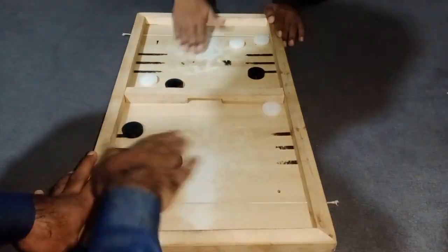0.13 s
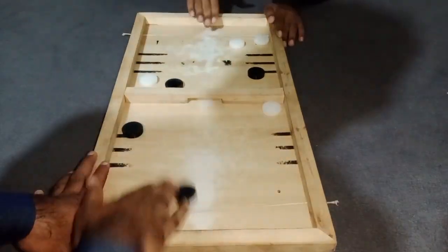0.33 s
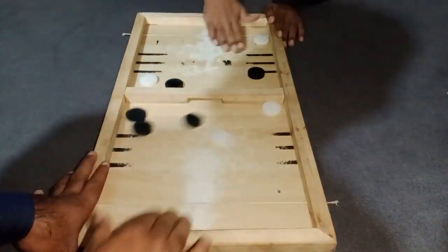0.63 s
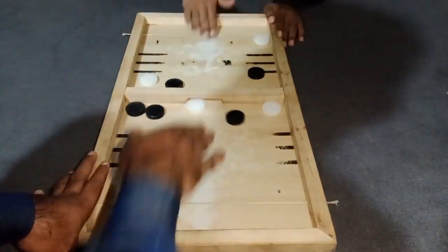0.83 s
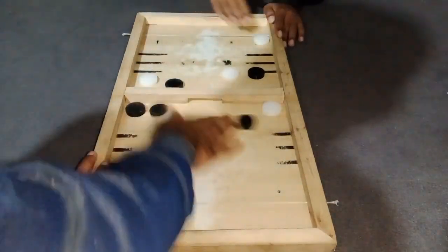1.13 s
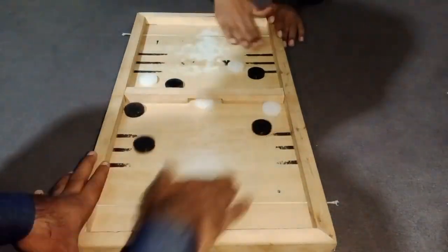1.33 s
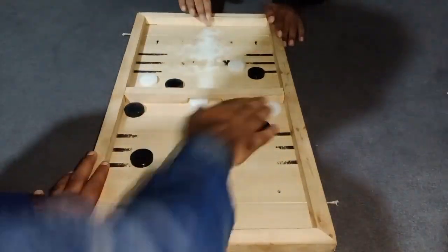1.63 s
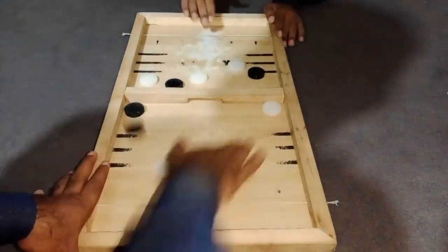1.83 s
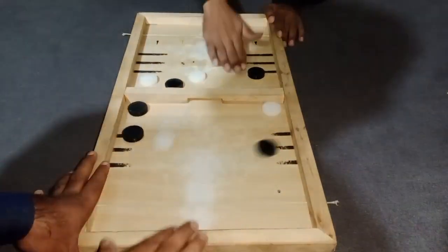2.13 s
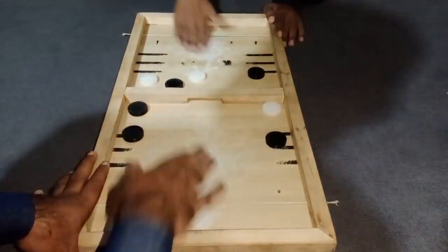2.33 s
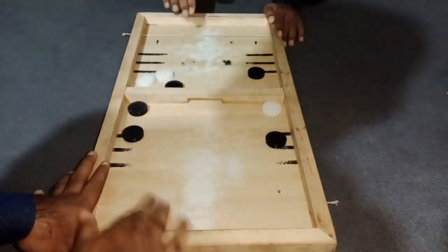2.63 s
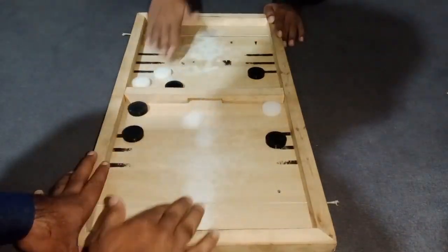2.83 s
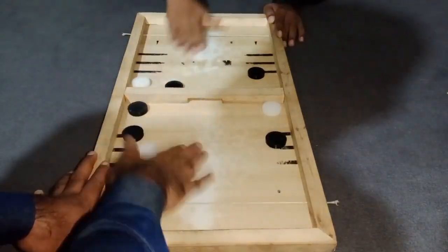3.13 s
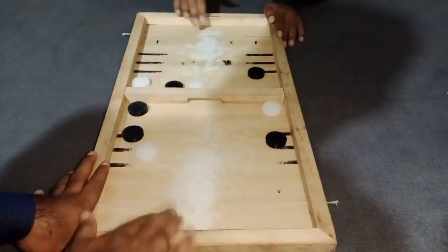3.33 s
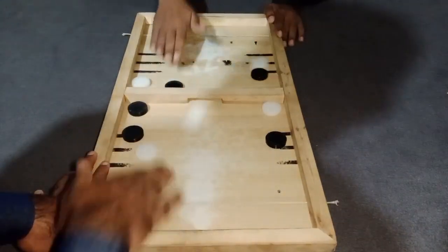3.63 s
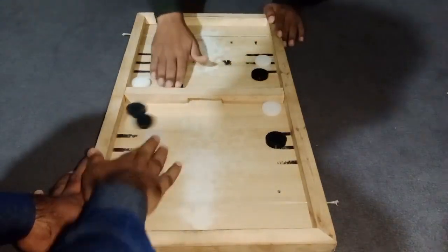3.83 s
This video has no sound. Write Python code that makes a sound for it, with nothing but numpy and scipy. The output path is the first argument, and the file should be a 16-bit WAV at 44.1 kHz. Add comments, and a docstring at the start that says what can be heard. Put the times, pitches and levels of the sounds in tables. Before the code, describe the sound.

Wooden board game pucks knock rails in quick irregular bursts, with scrapes and soft hand thuds

```python
"""Hard pucks, shot by two players across a wooden board, clack on each other and knock on the rails. Each blow
is a click, ringing wood and dying ticks; shaped noise answers it late, as a swelling reverberation. Pucks and
sleeves slide in between (patchy noise); hands thud on the board, and a short low bump comes at 2.12 s (soft
bursts of low noise). A quiet room hums below in steady noise, and a look-ahead limiter ducks around the hardest
blows."""
import sys
import numpy as np
from scipy import signal
from scipy.fft import rfft, irfft, next_fast_len
from scipy.io import wavfile
from scipy.ndimage import uniform_filter1d, minimum_filter1d, map_coordinates

SR = 44100
rng = np.random.default_rng(int(sys.argv[2]) if len(sys.argv) > 2 else 0)


def log_audio(samples):
    """Write samples as a 16-bit WAV file to the path given in sys.argv[1]."""
    # one column per channel
    frames = np.atleast_2d(samples).T
    # limit to full scale, then quantise
    limited = np.clip(frames, -1, 1)
    pcm = np.round(limited * 32767).astype(np.int16)
    wavfile.write(sys.argv[1], SR, pcm)


N = 176400  # samples: 4 s


def amp(db):
    """Decibels to gain."""
    return 10 ** (np.asarray(db) / 20)


def unit(x):
    """Scaled to rms 1."""
    return x / np.sqrt(np.mean(x ** 2) + 1e-20)


def over(x, seconds):
    """Scaled so that its energy equals rms 1 for that long."""
    return x / np.sqrt(np.sum(x ** 2) / (seconds * SR) + 1e-20)


def fade(t, t60):
    """Exponential decay that falls by 60 dB in t60 seconds."""
    return np.exp(-np.log(1000) * t / t60)


def along(points, hz):
    """Read a curve of (Hz, value) points on a log frequency axis."""
    f, v = np.transpose(points)
    return np.interp(np.log(hz + 1), np.log(f + 1), v)


def filtered(x, response):
    """x with each frequency scaled by response(hz)."""
    m = next_fast_len(len(x) + 4096)
    gain = response(np.fft.rfftfreq(m, 1 / SR))
    return irfft(rfft(x, m) * gain, m)[:len(x)]


def add(out, x, s):
    """Mix x into out at s seconds; a start before zero loses its beginning."""
    k = round(s * SR)
    x, k = x[max(-k, 0):], max(k, 0)
    out[k:k + len(x)] += x[:len(out) - k]


# Tone shared by all blows: (frequency [Hz], level [dB])
BLOW_TONE = [(60, -25), (200, -2), (380, 8), (900, 4), (2000, 0), (5500, -1), (8000, -3), (9800, -14),
             (12300, -13), (16000, -25)]
# Where the low, mid, presence, treble and top levels of a blow apply: (frequency [Hz])
BAND_CENTRES = [380, 1150, 3200, 6800, 11000]
TOP_FALLS = 1.8  # a blow with weak treble loses this many times as many dB in the top band


def colour(band_db):
    """The short causal pulse of a blow with these low, mid, presence and treble levels; dull ones lose the top."""
    hz = np.fft.rfftfreq(1024, 1 / SR)
    treble = band_db[-1]
    levels = [*band_db, min(treble, TOP_FALLS * treble)]
    level_db = along(BLOW_TONE, hz) + along(list(zip(BAND_CENTRES, levels)), hz)
    # folding the cepstrum gives minimum phase: the pulse starts at once
    cepstrum = irfft(np.log(amp(level_db)))
    half = len(hz) - 1
    fold = np.r_[1, np.full(half - 1, 2), 1, np.zeros(half - 1)]
    return irfft(np.exp(rfft(cepstrum * fold)))


# Notes that puck and board ring with: (frequency [Hz], level against each other [dB], time to fall 60 dB [s])
WOOD_NOTES = [(310, -15.5, 0.19), (362.7, -11, 0.21), (408, -14, 0.13), (518, -18, 0.034),
              (800, -2.5, 0.028), (1150, -13, 0.028), (2474, -4.5, 0.034), (2775, -9.5, 0.075),
              (3830, 8, 0.0064), (4392, 7.5, 0.012), (5190, 20.5, 0.00077), (7390, 23, 0.0017)]
# the board's main note, whose pitch depends on the spot that is struck
KNOCK_DB, KNOCK_T60_S = 3, 0.036


def snap(t, ring_db, knock_hz):
    """An impulse plus the note of the struck spot and other wood notes, each varying in strength every time."""
    notes = [*WOOD_NOTES, (knock_hz, KNOCK_DB, KNOCK_T60_S)]
    hz, db, t60 = np.transpose(notes)[:, :, None]
    varied_db = db + 2 * rng.standard_normal(hz.shape)
    ring = np.sum(amp(varied_db) * fade(t, t60) * np.cos(2 * np.pi * hz * t), axis=0)
    impulse = t == 0
    return impulse + amp(ring_db) * ring / np.linalg.norm(ring)


def burst(t, db, t60, rate):
    """Dying random ticks of a given total energy, on average rate a second."""
    ticks = rng.standard_normal(len(t)) * (rng.random(len(t)) < rate / SR)
    x = ticks * fade(t, t60)
    return amp(db) * x / np.linalg.norm(x)


RING_DB = 1  # ringing wood against the impulse
# levels against the impulse and fall times, both before a dull blow raises or a bright one lowers them
CRACK_DB, CRACK_T60_S = 6, .0075
RATTLE_DB, RATTLE_T60_S, RATTLE_RATE = -2, 0.16, 2500  # puck chattering on the board, ticks per second
SOFTER_DB = 20  # this much less treble doubles the lengths and the gain of crack and rattle


def clack(t, band_db, knock_hz):
    """One blow: snap, crack and a rattle of tiny contacts; duller blows last longer and rattle more."""
    slow = 2 ** np.clip(-band_db[-1] / SOFTER_DB, -1, 1)
    crack = burst(t, CRACK_DB, CRACK_T60_S * slow, SR)
    rattle = burst(t, RATTLE_DB, RATTLE_T60_S * slow, RATTLE_RATE)
    contact = snap(t, RING_DB, knock_hz) + slow * (crack + rattle)
    return over(signal.fftconvolve(contact, colour(band_db)), .005)


# How long the reverberation lingers: (frequency [Hz], time to fall 60 dB [s])
ROOM_FADE = [(150, 0.66), (1200, 0.31), (6000, 0.33)]
# Tone of the reverberation: (frequency [Hz], level [dB])
ROOM_TONE = [(100, -5.5), (350, -0.5), (700, 3.5), (1250, 4), (2000, -2), (3300, 3), (5500, -2),
             (7500, -0.5), (11500, -8), (15000, -21)]
ROOM_START, SWELL_S = 0.34, 0.048  # the swell's first gain, and the time until it reaches 1
ROOM_GRAIN_DB = 2.5  # random unevenness from moment to moment


def reverberation(x):
    """An uneven, diffuse answer of fading noise that swells and lingers longest in the bass."""
    hz, t, z = signal.stft(rng.standard_normal(SR * 2 // 3), SR, nperseg=256)
    fading = fade(t, along(ROOM_FADE, hz)[:, None])
    tone = amp(along(ROOM_TONE, hz))[:, None]
    swell = np.minimum(ROOM_START + (1 - ROOM_START) * (t / SWELL_S) ** 2, 1)
    uneven = amp(ROOM_GRAIN_DB * rng.standard_normal(len(t)))
    tail = signal.istft(z * fading * tone * swell * uneven, SR, nperseg=256)[1]
    return over(signal.fftconvolve(x, tail), .07)


# Puck blows: (time [s], level [dB], low, mid and treble against the 2-5 kHz band [dB each],
# reverberation level [dB], note of the struck spot [Hz])
PUCK_BLOWS = [(-0.025, -34, -30.5, -6, -14, -27, 1380), (0.5631, -12.5, -9.5, -1.5, 9, -26, 980),
              (0.6188, -10, -25, -10, -11, -31, 1300), (0.6428, -15, -17.5, -4.5, -9, -30, 1280),
              (0.6604, -34, -30, 0, -6.5, -29.5, 990), (0.704, -15.5, -30.5, -6.5, -42, -46, 920),
              (0.767, -25.5, -11, -15, -7, -69, 1450), (0.849, -27, -31, 15, -5, -36.5, 1540),
              (0.8676, -24, -19.5, -2, -18, -34.5, 950), (0.878, -20, -19, 8.5, 5, -47, 950),
              (0.9163, -21.5, -40, -3, -9, -40, 1230), (0.933, -22.5, -15, -1.5, -13, -75, 1180),
              (1.0685, -5, -7, 0.5, 6, -30, 1300), (1.274, -23.5, -47, 7.5, 2, -27, 1330),
              (1.2815, -19, -18, -9, -14.5, -30.5, 1440), (1.354, -17, -25.5, -1.5, -14.5, -35, 930),
              (1.4091, -13.5, -34, -11, -9, -34.5, 1170), (1.7791, -2, -20, -7.5, 1, -29, 970),
              (1.8024, -29, -13, 10, -18, -39, 920), (1.9284, -12, -23, -17, 1, -43, 990),
              (1.9837, -25.5, -45, -55, -3.5, -46.5, 1380), (1.989, -23, -27.5, -3, -5.5, -26, 1284),
              (2.1232, -8.5, -43, -36, 4, -33.5, 800), (2.1727, -9, -26.5, -5.5, -13, -27, 1210),
              (2.3347, -18.5, -18.5, -2, -13, -38, 1195), (2.6047, -0.5, -4.5, 1.5, 3, -25, 1240),
              (2.7456, -22.5, -12, 9.5, -4.5, -40, 1260), (2.8528, -7, -24, -4, -9.5, -34.5, 930),
              (2.8766, -34, -24, 22, -8, -38.5, 970), (2.902, -10.5, -35, -3, -13, -27.5, 874),
              (3.4680, -10.5, -18, -1, -9.5, -26, 917), (3.5804, -21.5, -18.5, -7, 1.5, -32, 1310),
              (3.6182, -18, -18.5, 2.5, -18, -28, 1230), (3.695, -16.5, -10.5, -12, 1, -39, 970),
              (3.8090, -20, -43, 10.5, -16, -38.5, 1250), (3.9045, -8, -42, -19, 2, -38.5, 1090),
              (3.914, -18, -33, -37, -5, -45, 1520), (3.925, -22.5, -39, -1, -12, -35.5, 1510),
              (3.9535, -22.5, -25, -2.5, -7, -26.5, 1190)]
PREDELAY_S = 0.014  # wait before the reverberation
ROOM_RING_DB = -4  # ringing wood against the impulse, in what the room receives
ROOM_FOLLOW = 0.76  # share of a blow's colour that its reverberation keeps


def pucks():
    """Every blow sounds directly, then the room answers a less coloured copy a little later."""
    out, t = np.zeros(N), np.arange(SR // 5) / SR
    for s, db, low, mid, treble, room_db, knock_hz in PUCK_BLOWS:
        band_db = np.array([low, mid, 0, treble])
        add(out, amp(db) * clack(t, band_db, knock_hz), s)
        sent = signal.fftconvolve(snap(t, ROOM_RING_DB, knock_hz), colour(ROOM_FOLLOW * band_db))
        add(out, amp(room_db) * reverberation(sent), s + PREDELAY_S)
    return out


def wobble(rate):
    """A smooth random curve through rate points a second."""
    return map_coordinates(rng.standard_normal(4096), [np.arange(N) * rate / SR], mode="wrap")


def rush(spectrum, patchy_db):
    """Coloured noise, randomly louder and softer in patches of time and pitch."""
    z = signal.stft(rng.standard_normal(N), nperseg=512)[2]
    field = uniform_filter1d(rng.standard_normal(z.shape), size=3, axis=0)  # spread over pitch
    field = uniform_filter1d(field, size=18, axis=1)  # spread over time
    x = signal.istft(z * amp(patchy_db * unit(field)), nperseg=512)[1][:N]
    return unit(filtered(x, lambda hz: amp(along(spectrum, hz))))


# Sliding of pucks and sleeves: (time [s], scrape level [dB], hiss level [dB])
SLIDES = [(0, -34, -43.5), (.2, -50, -48.5), (.26, -57, -41.5), (.36, -56, -43.5), (.41, -41.5, -40),
          (.53, -44.5, -38), (.75, -34, -43.5), (.84, -45.5, -33.5), (1.022, -54, -43.5), (1.25, -79, -47),
          (1.42, -43, -49), (1.482, -46, -38.5), (1.58, -43.5, -34.5), (1.68, -48, -44),
          (1.76, -61.5, -44.5), (2.3, -33, -42), (2.451, -43, -36.5), (2.55, -39.5, -41.5),
          (2.85, -47.5, -41.5), (3.16, -62.5, -46), (3.22, -45, -40), (3.33, -44.5, -37),
          (3.43, -51, -43.5), (4, -45, -43)]
# Tone of the scrape: (frequency [Hz], level [dB])
SCRAPE_TONE = [(150, -18), (350, -9.5), (850, -5), (1050, -3.5), (1300, 12), (1650, 5.5), (3400, 3),
               (5000, -3.5), (9000, -101)]
# Tone of the hiss, before it brightens: (frequency [Hz], level [dB])
HISS_TONE = [(1500, -26), (3800, -6), (7500, 0), (8600, -4), (10000, -13), (15700, -23), (16300, -50)]
# Spread of the random patches: (scrape [dB], hiss [dB])
PATCHINESS = [3.6, 1.9]
GRAIN_DB, GRAIN_RATE = 2.3, 49  # size of the quick level changes, and their points per second
AIR_HZ, BRIGHTENS = 8300, 0.77  # hiss above this gains so many extra dB for each dB of a faster slide


def sliding():
    """Grainy friction: a patchy scrape in the board, and a smoother hiss that brightens as it gets louder."""
    s, *levels = np.transpose(SLIDES)
    scrape_db, hiss_db = [np.interp(np.arange(N) / SR, s, db) for db in levels]
    scrape_patchy_db, hiss_patchy_db = PATCHINESS
    scrape = rush(SCRAPE_TONE, scrape_patchy_db)
    hiss = rush(HISS_TONE, hiss_patchy_db)
    air = filtered(hiss, lambda hz: 1 - 1 / (1 + (hz / AIR_HZ) ** 10))
    air_gain = amp(BRIGHTENS * (hiss_db - hiss_db.mean()) - 3)
    hiss = hiss + air * (air_gain - 1)
    scrape_gain = amp(scrape_db + GRAIN_DB * wobble(GRAIN_RATE))
    hiss_gain = amp(hiss_db + GRAIN_DB * wobble(GRAIN_RATE))
    return scrape_gain * scrape + hiss_gain * hiss


# Tone of the quiet room: (frequency [Hz], level [dB])
QUIET_TONE = [(20, -24), (60, 9.5), (110, 8), (500, -8.5), (15000, -54)]
QUIET_DB = -71.5


def quiet_room():
    """Faint background noise, strongest in the bass."""
    return amp(QUIET_DB) * rush(QUIET_TONE, patchy_db=2.5)


# Low thuds: hands on the board, and a short low bump at 2.12 s: (time [s], level [dB], centre frequency [Hz],
# time to fall 60 dB [s])
LOW_THUDS = [(0.031, -48, 203, 0.36), (2.122, -19, 101, 0.028), (2.1222, -16.5, 310, 0.014),
             (2.63, -34.5, 437, 1), (2.675, -35, 276, 0.5), (2.689, -49.5, 114, 0.9),
             (3.276, -22.5, 257, 0.012), (3.28, -44.5, 274, 0.49), (3.696, -32, 345, 0.15)]
THUD_ATTACK_S, THUD_WIDTH = .004, .36  # rise time; bandwidth as a natural log of frequency


def thuds():
    """Soft low thuds and bumps: fading noise kept to a band around one pitch."""
    out, t = np.zeros(N), np.arange(SR // 2) / SR
    for s, db, centre, t60 in LOW_THUDS:
        push = np.zeros(N)
        rise = 1 - np.exp(-t / THUD_ATTACK_S)
        add(push, rng.standard_normal(len(t)) * fade(t, t60) * rise, s)
        body = filtered(push, lambda hz: np.exp(-.5 * (np.log((hz + 1) / centre) / THUD_WIDTH) ** 2))
        out += amp(db) * over(body, t60 / 10)
    return out


def scene():
    """The game over a quiet room: all sounds add up in one channel."""
    return (pucks() + thuds() + sliding() + quiet_room())[None]


CEILING_DB = -5.5  # the limiter turns down peaks above this
LOOKAHEAD_S, HOLD_S, GLIDE_S = .021, .014, .006  # ducks this early, stays this long, glides this smoothly
TOP_HZ = 16850  # nothing is kept from here up


def record(dry):
    """A limiter turns down just before each hard blow and lets go right after it; then the top is cut off."""
    x = dry[0]
    need_db = np.minimum(0, CEILING_DB - 20 * np.log10(np.abs(x) + 1e-9))
    ahead, hold = int(LOOKAHEAD_S * SR), int(HOLD_S * SR)
    held_db = minimum_filter1d(need_db, ahead + hold + 1, origin=(hold - ahead) // 2)
    gain_db = uniform_filter1d(held_db, int(GLIDE_S * SR) + 1)
    return filtered(x * amp(gain_db), lambda hz: hz < TOP_HZ)[None]


dry = scene()
out = record(dry)
log_audio(out)
```